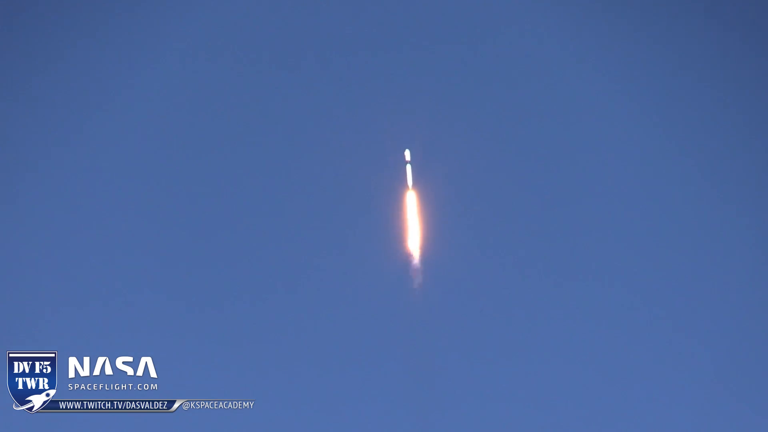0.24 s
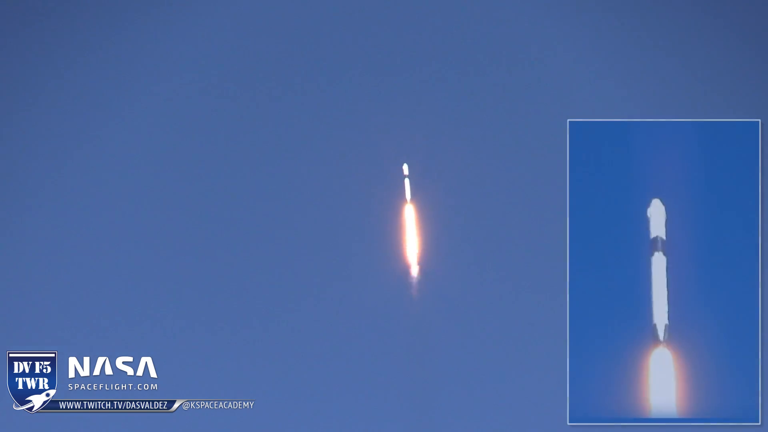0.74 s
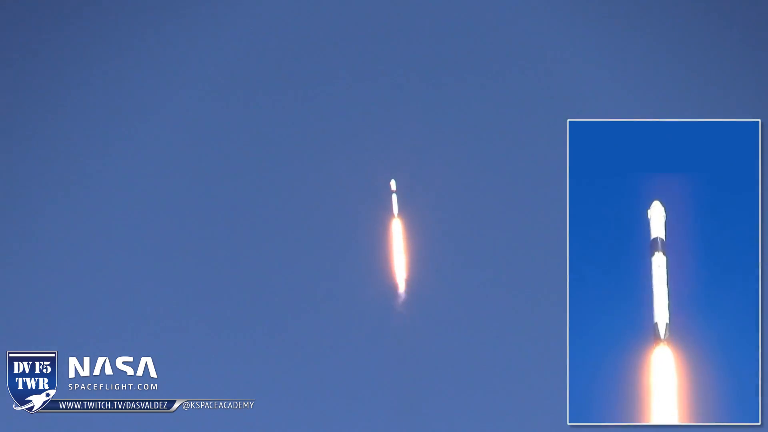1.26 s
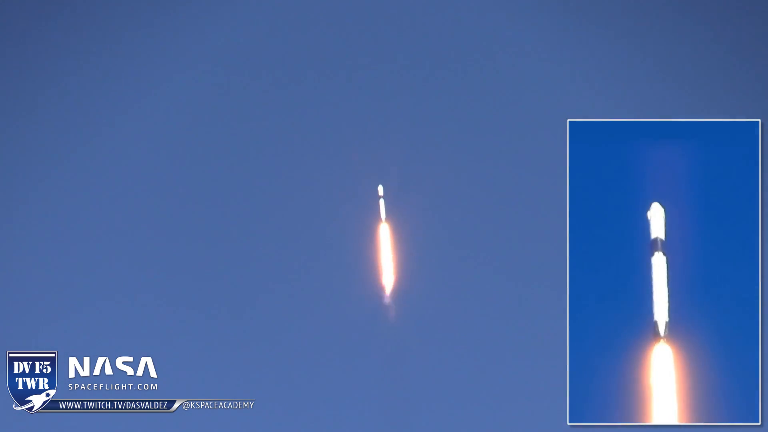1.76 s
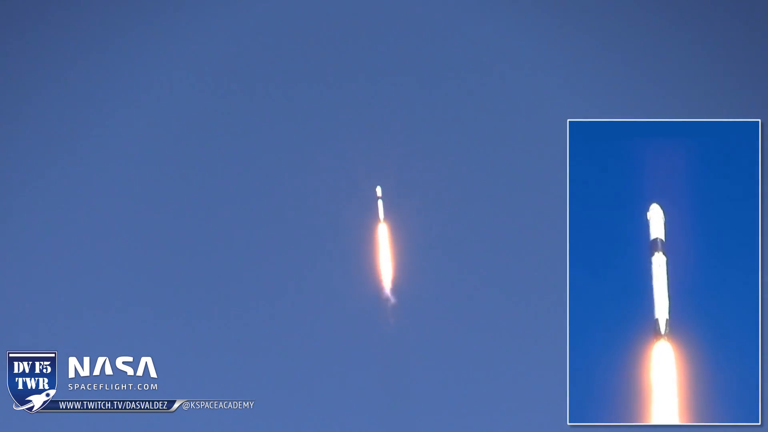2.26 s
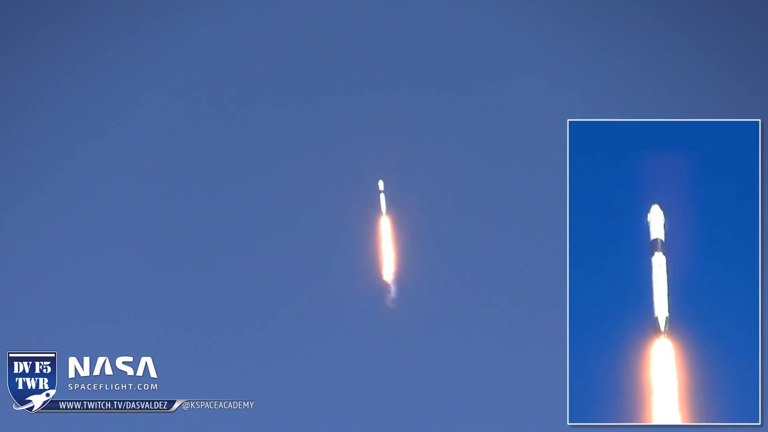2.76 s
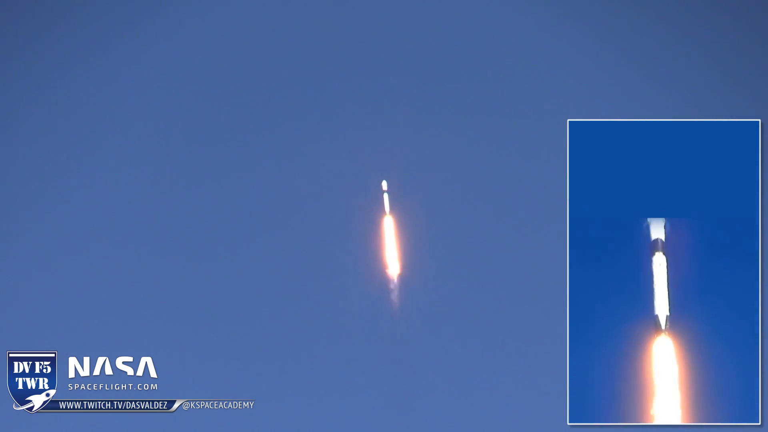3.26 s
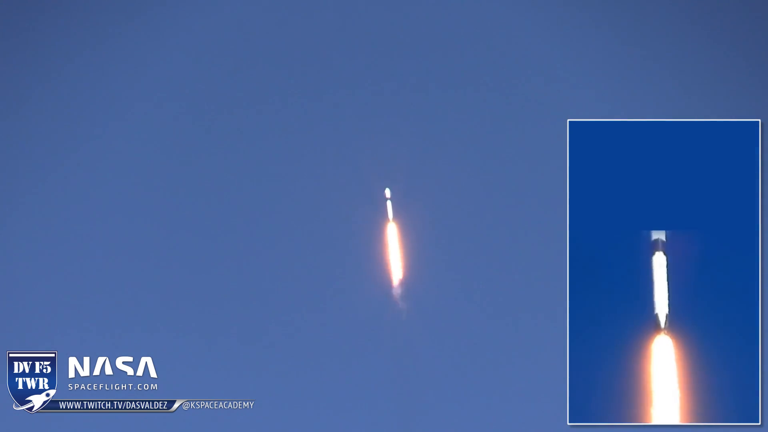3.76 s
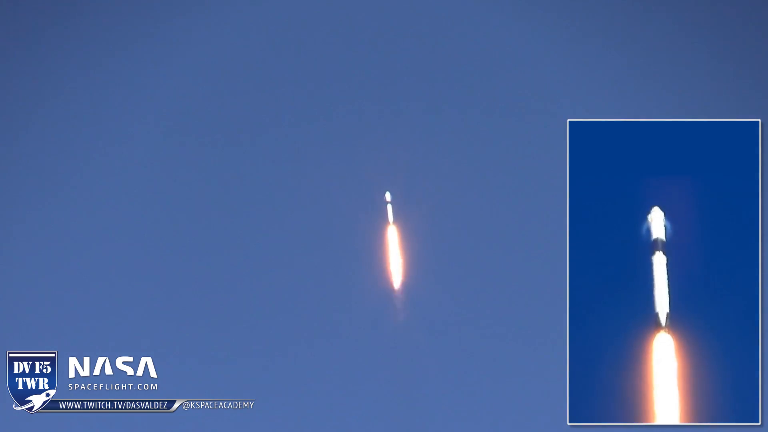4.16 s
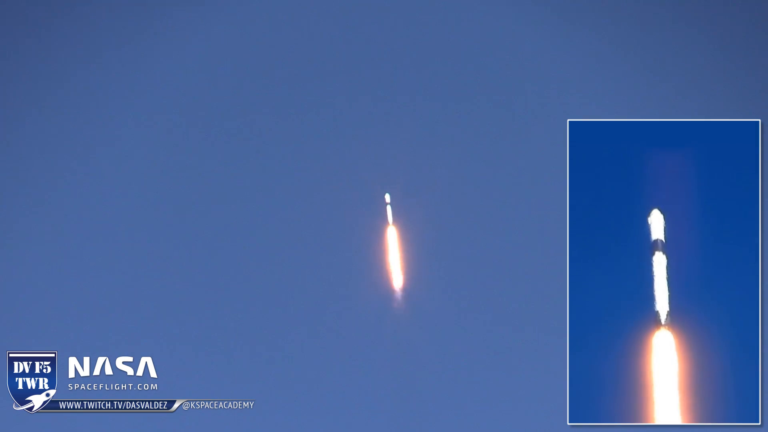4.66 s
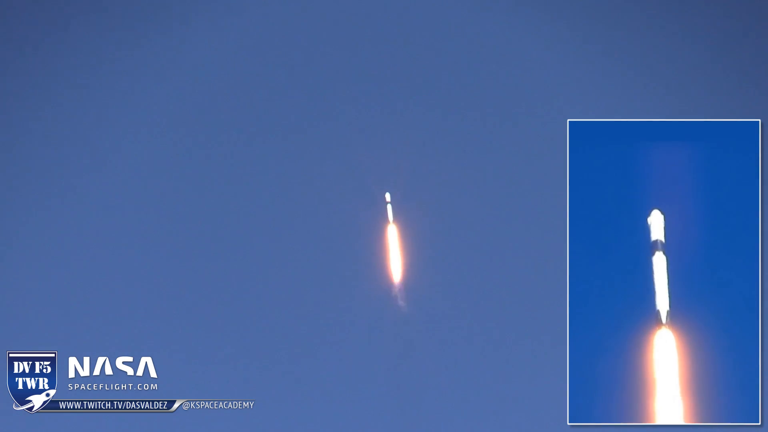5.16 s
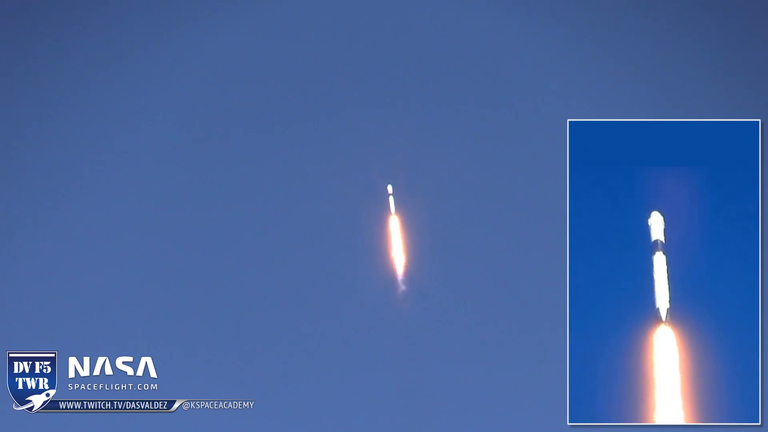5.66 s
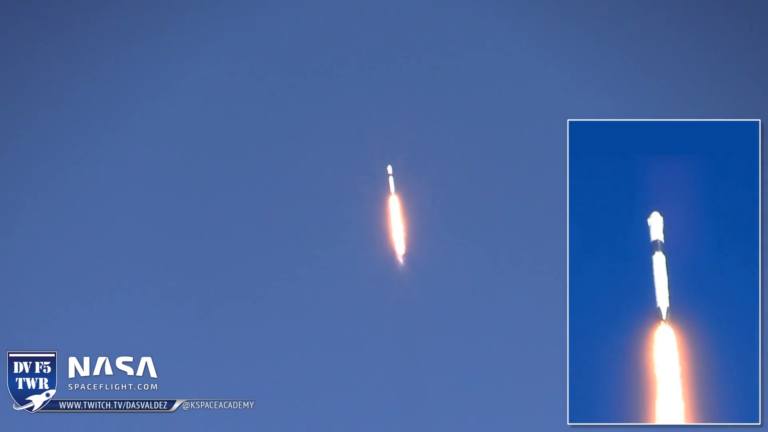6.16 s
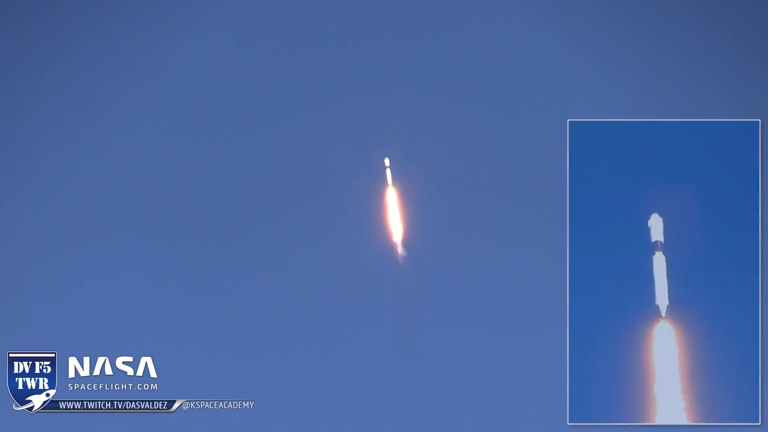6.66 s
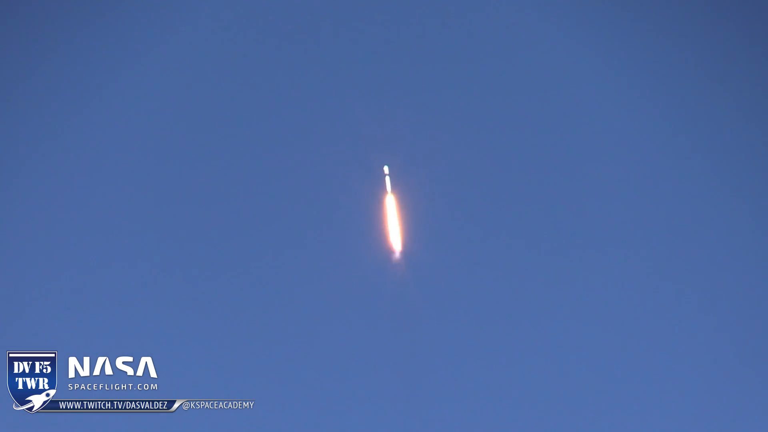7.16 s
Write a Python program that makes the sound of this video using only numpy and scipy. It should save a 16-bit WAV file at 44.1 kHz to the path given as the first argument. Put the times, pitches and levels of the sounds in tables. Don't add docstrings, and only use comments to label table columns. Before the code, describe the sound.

Loud, close-packed crackling from rocket exhaust, recorded outdoors from the ground at long distance. Low thumps of varying strength tumble over one another without rhythm, and harder cracks burst out with ragged edges and brief overload clicks. The rumbling roar underneath sinks in the middle and swells at the end. Short scattered reflections come from ground and trees; the image is almost centred, with very faint wind hiss.

```python
import sys
import numpy as np
from scipy import signal
from scipy.fft import rfft, irfft, next_fast_len
from scipy.io import wavfile
from scipy.ndimage import uniform_filter1d, map_coordinates

SR = 44100
rng = np.random.default_rng(int(sys.argv[2]) if len(sys.argv) > 2 else 0)


def store_pcm(level_fs):
    pcm = np.round(np.clip(level_fs, -1, 1) * 32767).astype(np.int16)
    wavfile.write(sys.argv[1], SR, np.atleast_2d(pcm).T)


def field_ratio(decibels):
    return 10 ** (np.asarray(decibels, dtype=float) / 20)


N = 327222

# start_s [s], level_db [dB]
ROAR_LEVEL = [(0, -19.5), (0.54, -21), (0.93, -21), (1.34, -28), (1.84, -24.5), (2.07, -28), (2.55, -20.5),
              (2.93, -29), (3.3, -26.5), (3.75, -24.5), (4.19, -23.5), (4.63, -25.5), (5.5, -23.5),
              (6.08, -25.5), (6.88, -21), (7.42, -18)]
# start_s [s], level_db [dB]
RUMBLE_LEVEL = [(0, -22.5), (0.55, -18), (1.0, -19), (1.6, -30.5), (2.1, -25.5), (2.7, -21), (3.2, -26),
                (4.2, -30.5), (4.7, -37.5), (6.0, -37), (7.42, -26.5)]
# pitch_hz [Hz], level_db [dB per Hz]
RUMBLE_TONE = [(13, -32.5), (22, -12.5), (70, 5.5), (95, 3.5), (130, -9.5), (170, -32.5), (290, -120)]
# pitch_hz [Hz], level_db [dB per Hz]
ROAR_TONE = [(35, -44), (60, 5), (133, 0.5), (256, -3.5), (350, -3.5), (442, -13), (533, -9.5),
             (1220, -36.5), (2500, -61.5), (3250, -85.5), (5500, -120)]
# pitch_hz [Hz], level_db [dB]
HAZY_ROAR_TONE = [(80, -5), (130, 3), (180, 6), (270, 0), (500, -5), (1500, -3.5)]
# start_s [s], haze [0-1]
HAZE_AMOUNT = [
    (0, .05),
    (2.0, 0.3),
    (3.0, 0.5),
    (3.9, 0.8),
    (4.3, 1),
    (5.5, 0.9),
    (6.3, 0.98),
    (6.9, .35),
    (7.42, .5),
]

# start_s [s], hiss_db [dB]
WIND_LEVEL = [(0, -73.5), (1.03, -78), (1.42, -83.5), (2.04, -82), (2.6, -80.5), (3.1, -88), (3.62, -80),
              (3.97, -78.5), (4.5, -79.5), (4.86, -83.5), (5.3, -75.5), (5.8, -80), (6.5, -75), (7.42, -74)]
# pitch_hz [Hz], level_db [dB per Hz]
WIND_TONE = [(1060, -25.5), (1800, 0.5), (2310, -4.5), (3110, -7), (5580, -14), (13600, -15.5),
             (15400, -31)]
# pitch_hz [Hz], level_db [dB]
PORT_TONE = [(2500, -29.5), (3800, -2), (6800, 0), (8500, -9), (13000, -9.5), (14500, -60)]
# pitch_hz [Hz], level_db [dB]
STEADY_HISS = [(11900, 1.0), (12300, -44.5)]
PUFF_HISS = [(4800, -4), (5400, -40)]
TOP_HISS = [(14300, 0.5), (14700, -50.5)]

# start_s [s], step_db [dB], front_ms [ms]
ROUNDED_THUDS = [(0.003, -1.5, 0.77), (0.0091, -2.5, 0.99), (0.0525, -5, 0.89), (0.1106, -8.5, 1.2),
                 (0.137, -4, 0.83), (0.1417, -4, 1.3), (0.1809, -10, 0.74), (0.2273, -6, 1.1),
                 (0.231, 0.6, 0.64), (0.2431, -5.5, 1.1), (0.2738, -5, 3.1), (0.3302, -7, 0.43),
                 (0.3369, -5, 2.3), (0.3414, -3, 0.74), (0.3447, -8.5, 0.9), (0.3968, -7.5, 0.76),
                 (0.4332, -5.5, 0.87), (0.466, -10, 0.68), (0.565, -8, 0.42), (0.57, -5, 2.3),
                 (0.6593, -7.5, 0.82), (0.6809, -4, 0.67), (0.7135, -7, 2.8), (0.719, -3.5, 1.2),
                 (0.7755, -10, 1.4), (0.8004, -6, 2.2), (0.8227, -4.5, 0.89), (0.8467, -8, 2.3),
                 (0.887, -9, 2.1), (0.913, -6.5, 1.35), (0.9219, -9.5, 0.9), (0.9276, -5.5, 2.5),
                 (0.9399, -6.5, 0.95), (0.9704, -7.5, 1.6), (0.998, -5.5, 0.98), (1.0197, -7.5, 1),
                 (1.043, -3.5, 1), (1.0609, -10, 1.1), (1.0681, -8, 1.7), (1.0892, -4.5, 1.6),
                 (1.2085, -2, 1.2), (1.2781, -3, 1.1), (1.3151, -4, 1.1), (1.337, -9.5, 1.6), (1.37, -8, 1.8),
                 (1.5088, -2.5, 1.7), (1.6219, -12.5, 1.2), (1.664, -5.5, 0.83), (1.672, -11, 0.82),
                 (1.6923, -4, 1.3), (1.7518, 0.5, 0.77), (1.8352, -4.5, 0.64), (1.8497, -6.5, 1.1),
                 (1.9056, -10.5, 0.58), (1.965, -9, 1.4),
                 (1.983, -5.5, 1.1), (2.053, -3, 1.35), (2.064, -1, 1), (2.1981, -1, 1.2),
              (2.2542, -10.5, 1.2), (2.27, -8, 1.6), (2.2737, -5, 1.2), (2.287, -9.5, 0.91),
              (2.3001, -11, 1.6), (2.3585, -10.5, 1.1), (2.3912, -7, 1.8), (2.4515, 0, 1.35),
              (2.5284, -5, 2.1), (2.5591, -9.5, 0.7), (2.5937, -12.5, 0.79), (2.6324, -4.5, 0.87),
              (2.6377, -3.5, 0.9), (2.6499, -6, 1.9), (2.7073, 0, 0.7), (2.7206, -7.5, 0.9),
              (2.7449, -5, 0.71), (2.7479, -6, 1.3), (2.8511, -4, 0.74), (2.8565, -5, 1.2),
              (3.0209, -8.5, 1.3), (3.0274, -8.5, 0.9), (3.052, -3, 0.64), (3.066, -5, 0.59),
              (3.169, -5.5, 0.83), (3.2962, -8, 0.52), (3.338, -8, 0.76), (3.366, 0, 0.65),
              (3.4532, -6, 1.1), (3.4962, -5, 1.6), (3.5048, -0.5, 0.56), (3.5288, 0.5, 0.52),
              (3.589, -6, 2.3), (3.68, -7.5, 0.9), (3.7079, -5.5, 1.6), (3.7125, -2, 0.77),
              (3.7483, -6, 1.2), (3.772, -6.5, 2.1), (3.7762, -2, 0.59), (3.797, -9.5, 0.99),
              (3.801, -4, 0.52), (3.8277, -6.5, 1), (3.877, -7.5, 1.9), (3.881, -0.5, 0.55),
              (3.8939, -9, 2.3), (3.8984, -3.5, 0.69), (3.914, -6, 0.91), (3.9491, -7.5, 1.5),
              (3.975, -14.5, 0.85), (3.9954, -11, 0.8), (4.0084, -7.5, 0.74),
                 (4.0325, -3, 1.5), (4.0382, -4.5, 0.93), (4.0946, 0.8, 1.6), (4.1175, -2, 0.9),
                 (4.1306, -12, 1.35), (4.135, -3.5, 0.7), (4.1543, -6, 1.5), (4.1591, -9.5, 1.2),
                 (4.1859, -1.6, 1.3), (4.216, -2.5, 1.35), (4.223, -8.5, 1.1), (4.2565, -1, 1.6),
                 (4.2715, -12, 0.95), (4.2784, -4, 1.5), (4.284, -9, 1.6), (4.2877, -2, 1.35),
                 (4.2929, -6.5, 1), (4.313, -7.5, 0.83), (4.3233, -6.5, 1.6), (4.3396, -10, 1.7),
                 (4.346, -11, 1.6), (4.3654, -7, 1.1), (4.4119, -11, 1.5), (4.4135, 1.5, 0.64),
                 (4.5, -10, 1.35), (4.5582, -6.5, 1.6), (4.6109, -9, 1.33), (4.672, -4, 1.6),
                 (4.8694, -11, 1.5), (4.8891, -9, 1.9), (4.9134, -10.5, 2.1), (4.9214, -7, 1.6),
                 (4.9708, -3, 0.9), (5.0505, 4, 0.56), (5.082, -4.5, 1.7), (5.119, -8.5, 1.5),
                 (5.1399, -3.5, 1.7), (5.1655, -10, 1.35), (5.2294, -5.5, 1.8), (5.2456, -6, 1.35),
                 (5.2675, -9, 1.8), (5.302, -4.5, 1.6), (5.3216, -1.5, 1.5), (5.3464, -7.5, 1.35),
                 (5.3541, -3.5, 1.6), (5.3755, -1.5, 2.1), (5.4517, 4, 1.2), (5.4884, -8, 2.3),
                 (5.4975, -9.5, 1.7), (5.5273, -4, 1.8), (5.5437, -9, 1.7), (5.5677, -10, 1.7),
                 (5.5932, -3.5, 1.8), (5.6607, -7, 1.6), (5.69, -4.5, 1.6), (5.7081, -5.5, 1.9),
                 (5.742, -5, 1.8), (5.7984, -4.5, 1.7), (5.854, -7.5, 1.7), (5.8884, -2.5, 1.4),
                 (5.9584, -3.5, 1.1), (5.9849, -9, 1.9), (6.0334, -6.5, 1.6), (6.061, -5, 1.7),
                 (6.09, -9, 1.3), (6.1155, -7.5, 2.1), (6.129, -6.5, 1.9), (6.153, -3, 1.3),
                 (6.213, -5.5, 1.35), (6.2662, -4.5, 1.3), (6.3169, -8.5, 2.7), (6.3226, -3.5, 1.4),
                 (6.3366, -6.5, 2.1), (6.376, -8.5, 1.3), (6.4216, -4, 1.35), (6.4416, -4, 1.9),
                 (6.5182, -5.5, 1.3), (6.5565, -2.5, 1.8), (6.5764, -5, 1.1), (6.6055, -10.5, 1.35),
                 (6.617, -9.5, 1.5), (6.713, -10.5, 1.35), (6.7352, -9.5, 1.8), (6.7675, -5, 1.1),
                 (6.814, -5.5, 1.2), (6.839, -1, 1.6), (6.861, -6.5, 0.96), (6.945, -9, 1.5),
                 (7.0076, -2, 1.1), (7.0192, -8.5, 2.1), (7.0242, -10.5, 1.6), (7.0673, -1.1, 1.3),
                 (7.074, -11, 1.2), (7.0795, -5, 2.1), (7.0852, -6, 1.6), (7.0921, -8.5, 1.7),
                 (7.1115, -0.9, 1.1), (7.1482, -8, 0.5), (7.1725, -5.5, 1.5), (7.1944, -11, 1.4),
                 (7.2415, -2.5, 1.2), (7.2577, -10, 2.1), (7.267, -4, 1.2), (7.2716, -12, 1.2),
                 (7.283, -11.5, 2.8), (7.29, -1, 1.4), (7.296, -10.5, 1.5), (7.3119, -14.5, 1.1),
                 (7.3513, -7, 1.35), (7.3645, -9.5, 2.3), (7.3762, -4.5, 1.2), (7.384, -6.5, 1.9)]
# start_s [s], trough_db [dB]
STRAY_THUDS = [(0.066, -8), (0.263, -12), (0.4831, 1), (0.5528, -15.5), (0.717, 3), (0.9302, -2),
               (1.024, -11.5), (1.2264, -9), (1.4716, -9.5), (1.613, -8), (1.8013, -7), (1.9002, -11.5),
               (2.0278, -13), (2.3235, -9), (2.9852, -7), (3.1066, -9), (3.187, -9), (3.571, -4.5),
               (3.7386, -9), (3.9244, -11.5), (3.9952, -7.5), (4.0284, -11.5), (4.0666, -0.5),
               (4.1485, -10.5), (4.262, -7.5), (4.3283, -10), (4.3853, 2.8), (4.4142, -4.5), (4.4758, -1.8),
               (4.5645, -7), (4.726, 3.1), (4.7699, -13.5), (4.8592, -9.5), (4.8962, -12), (5.3964, -13),
               (5.429, -9.5), (5.5551, -17), (5.7276, -12), (6.3038, -10.5), (7.0139, -5), (7.163, -8.5),
               (7.346, -0.8)]
# start_s [s], least_ms [ms]
LEAST_FRONT = [
    (0, 0.36),
    (1.3, 0.55),
    (2.2, 1),
    (3.1, 1.12),
    (3.9, 1.23),
    (4.4, 1.39),
    (5.2, 1.68),
    (5.7, 1.3),
    (7.42, 0.59),
]
# start_s [s], step_db [dB], front_ms [ms], edge_db [dB]
SOFT_SHOCKS = [(0.1256, -0.5, 0.91, -35), (0.145, -3, 1.1, -30.5), (0.2026, -4.5, 1, -39.5),
               (0.2349, 1, 0.82, -23.5), (0.278, -2.5, 1, -40), (0.521, -2, .98, -25),
               (0.723, -1, 0.85, -20.5), (0.7884, -3.5, 0.79, -37), (0.856, -1, 0.98, -21.5),
               (1.0748, 0.3, 1.4, -38.5), (1.3441, -2.5, 1.6, -36.5), (1.63, -4, 0.96, -13.5),
               (2.0977, -2.5, 1.1, -30), (2.1427, 0, 1, -23), (2.369, 2, 1, -37.5), (2.4, 1.5, 1.1, -22.5),
               (2.4433, -2, 1.4, -33.5), (2.481, -1, 1.1, -32.5), (2.565, 0, 1.4, -33),
               (2.8108, -14.5, 0.28, -31), (2.894, -2.5, 0.95, -30), (3.128, -9, 0.52, -18.5),
               (3.254, -2, 0.86, -33.5), (3.4609, -3, 0.91, -39.5), (3.7511, -2, 0.98, -33.5),
               (3.8309, -0.5, 1.1, -35), (4.5472, -2.5, 1.3, -39.5), (4.8088, -1.5, 1.3, -24.5),
               (4.8362, -1, 1.3, -20), (4.9943, -0.6, 1.3, -29.5), (5.9361, -3, 1.2, -33.5),
               (6.469, 0, 1.2, -26)]
# start_s [s], step_db [dB], front_ms [ms], edge_db [dB]
HARD_SHOCKS = [(0.324, 5.5, .85, -21), (0.4781, -0.5, 0.94, -8.5), (0.5572, 4.5, 0.82, -8),
               (0.9055, -0.5, 0.83, -10), (1.0355, 2, 1.2, -15.5), (1.1192, 4, 1.1, -13.5),
               (1.259, 2.5, 1.4, -13.5), (1.396, 2.5, 0.62, -28.5), (1.4526, 1.3, 1.6, -6.5),
               (1.6045, -3.5, .7, -14.5), (1.742, -0.5, 1.4, -9.5), (1.7872, 1.5, 1.2, -16),
               (1.824, 4, 1.2, -17.5), (1.895, 5, 1.1, -7), (2.3319, 5, 0.8, -14), (2.5993, 2, 1.2, -12.5),
               (2.695, 2.5, 1.1, -19), (2.8131, 2.5, 0.47, -27.5), (2.9447, 1, 1.1, -18.5),
               (3.1308, 0.5, 0.75, -22.5), (4.0617, 1, 1.1, -22), (4.0977, 3, 1, -16.5), (4.3798, 5, 1, -3),
               (4.47, 1.5, 1.1, -14), (4.7194, 3.5, 1.1, -7.5), (5.605, 5, 1.3, -18.5),
               (6.6576, 4, 1.1, -17), (6.8932, 2, 1, -15), (7.138, 2, 0.73, -17), (7.3405, 2.5, 1.2, -20)]
# start_s [s], extra_db [dB]
EDGE_BRIGHTNESS = [(0.3237, 10), (0.5566, 5), (1.1203, 5.5), (1.259, -2.5), (1.4518, 9.5), (1.6045, 12),
                   (1.742, 5.5), (1.895, 11), (2.1414, 8), (2.8135, -14), (3.1328, 19), (3.7521, 11),
                   (4.7195, 6.5), (6.6576, 3), (6.8934, -12), (7.3404, -22)]
# pitch_hz [Hz], level_db [dB]
DULL_EDGE = [(250, -25.5), (500, 2.5), (900, 4.5), (1500, -10.0), (2200, -38.5), (3500, -57.5), (9000, -110)]
BRIGHT_EDGE = [(900, -29.0), (1600, 1.5), (2200, -6.0), (3200, -23.0), (5000, -36.5), (8000, -69.0), (13000, -110)]

# pitch_hz [Hz], t60_s [s]
ECHO_LENGTH = [(100, 0.69), (500, 0.41), (1500, 0.25), (4000, 0.029)]
# pitch_hz [Hz], level_db [dB]
ECHO_TONE = [(60, -19), (200, -18.5), (700, -3.5), (1800, -10), (5000, -15.5)]
# pitch_hz [Hz], level_db [dB]
SIDE_TONE = [(60, -40), (250, -44), (700, -32), (1500, -27.5), (4000, -12)]

# start_s [s], peak_db [dB]
OVERLOADS = [(0.3239, -20), (0.559, -21), (1.1182, -22), (1.245, -49.5), (1.3959, -20), (1.438, -44),
             (1.745, -46), (1.8956, -19.5), (2.0664, -37), (2.3207, -40.5), (2.4512, -34.5),
             (2.8118, -19.5), (2.9396, -44), (3.1295, -19.5), (3.251, -46.5), (3.3823, -52), (3.772, -45.5),
             (4.325, -42), (4.3781, -25.5), (4.55, -47), (4.718, -30.5), (4.9745, -49.5), (5.529, -41),
             (5.6031, -20), (5.9286, -48), (6.6586, -24.5)]
# start_s [s], left_over_right_db [dB]
OVERLOAD_LEAN = [
    (0.3238, 2),
    (0.559, -0.5),
    (1.3959, 1),
    (4.3784, -6),
    (4.7173, -6),
]
# pitch_hz [Hz], level_db [dB]
TICK_TONE = [(500, -10.5), (1500, 14.5), (3000, 3.5), (4300, 0.5), (6000, -4.0), (9000, -5.5),
             (14300, -8.5), (15000, -36.5), (16000, -88.5)]
# start_s [s], peak_db [dB], width_ms [ms]
PRESSURE_SPIKES = [
    (2.8106, -4, .19),
    (2.8136, -8.5, .1),
    (3.1268, -11, 0.41),
    (3.1295, -12, 0.097),
]
# pitch_hz [Hz], level_db [dB]
MICROPHONE_TONE = [(8, -59.5), (25, -16), (40, -5.5), (100, 2.0)]


def unit(x):
    return x / np.sqrt(np.mean(x ** 2) + 1e-20)


def along(points, pitch_hz):
    hz, value = np.transpose(points)
    return np.interp(np.log(pitch_hz + 1), np.log(hz + 1), value)


def curve(rows):
    return np.interp(np.arange(N) / SR, *np.transpose(rows))


def wobble(rate_hz):
    knots = rng.standard_normal(int(N * rate_hz / SR) + 4)
    return map_coordinates(knots, [np.arange(N) * rate_hz / SR])


def noise():
    return rng.standard_normal(N)


def coloured(x, tone):
    size = next_fast_len(N + 8192)
    gain = field_ratio(along(tone, np.fft.rfftfreq(size, 1 / SR)))
    return irfft(rfft(x, size) * gain, size)[..., :N]


def placed(waves, start_s, lead):
    at = np.round(start_s * SR).astype(int)[:, None] + np.arange(waves.shape[1])
    total = np.bincount(at.ravel(), waves.ravel(), N + 2 * waves.shape[1])
    return total[lead:][:N]


def haze(start_s):
    return np.clip(np.interp(start_s, *np.transpose(HAZE_AMOUNT)), 0, 1)


def fronts(start_s, step_db, front_ms, least_ms=0):
    size, lead = 2048, 512
    t_ms = (np.arange(size) - lead) / SR * 1000
    after_ms = np.maximum(t_ms, 0)
    front = np.clip(front_ms, .3, 4)[:, None]
    swing_ms = 1.894 + 3.53 * front
    build = 0.53 * np.exp(np.minimum(t_ms, 0) / (0.14 * swing_ms))
    recover = -np.exp(-after_ms / (0.4 * swing_ms)) * np.cos(2 * np.pi * t_ms / swing_ms)
    heave = 0.089 * np.exp(-after_ms / 15.0) * np.sin(2 * np.pi * after_ms / 18.0)
    pressure = np.where(t_ms < 0, build, recover + heave)

    pitch_khz = np.fft.rfftfreq(size, 1000 / SR)
    rounded_ms = np.maximum(front, np.reshape(least_ms, (-1, 1)))
    air = np.exp(-(0.26 * 2 * np.pi * pitch_khz * rounded_ms) ** 2)

    lag_ms = np.arange(size) / SR * 1000
    paths = rng.standard_normal((len(start_s), size)) * np.exp(-lag_ms / 6.2) * (lag_ms < 30)
    paths = rfft(paths / np.linalg.norm(paths, axis=1, keepdims=True))
    high_part = 1 / (1 + (450 / (np.fft.rfftfreq(size, 1 / SR) + 1)) ** 4)
    ragged = np.clip(1.6 * front - .3, .2, 1) * high_part
    air = air * (1 - 0.7 * ragged + 1.13 * ragged * paths)

    wave = field_ratio(step_db)[:, None] * irfft(rfft(pressure) * air, size)
    return placed(wave * signal.windows.tukey(size, .3), start_s, lead)


def roar():
    rumble = unit(coloured(noise(), RUMBLE_TONE))
    draw = rng.random((450, 3))
    small = fronts(draw[:, 0] * N / SR, -12 * draw[:, 1], 1.3 + 1.2 * draw[:, 2])
    blur = field_ratio(2.2 * np.tanh(wobble(25))) * coloured(noise(), ROAR_TONE)
    far = haze(np.arange(N) / SR)
    blur = (1 - far) * blur + far * coloured(blur, HAZY_ROAR_TONE)
    merged = field_ratio(-14.0) * unit(small) + field_ratio(-6.0) * unit(blur)
    return field_ratio(curve(RUMBLE_LEVEL) - 1.5) * rumble + field_ratio(curve(ROAR_LEVEL)) * merged


def wind():
    hiss = unit(coloured(noise(), WIND_TONE + [(16000, -120)]))
    low = coloured(hiss, STEADY_HISS)
    gust_db = curve(WIND_LEVEL) + 3.8 + 1.3 * wobble(13)
    puffs = 1. * (gust_db + 2 * wobble(16) > -77)
    flutter = uniform_filter1d(puffs, size=600)
    gust = field_ratio(gust_db + 2.0 * np.maximum(wobble(45) - 1, 0))
    ports = unit(coloured(noise(), [(1500, -78.5)] + PORT_TONE))
    ports = field_ratio(-87 + 3.0 * wobble(20)) * ports
    low = low + field_ratio(1.2 * (gust_db + 72.5) + 2.5 * wobble(7.8)) * coloured(hiss, PUFF_HISS)
    top = flutter * coloured(hiss - low, TOP_HISS)
    return gust * (low + top) + np.array([ports, -ports])


def thuds():
    late = [(start_s, trough_db - 2.5, .9) for start_s, trough_db in STRAY_THUDS]  # step_db, front_ms
    rows = ROUNDED_THUDS + late
    start_s, step_db, front_ms = np.transpose(rows)
    edge_db = step_db - 35 - 14.5 * haze(start_s)
    return np.transpose([start_s, step_db, front_ms, edge_db])


def all_shocks():
    return np.vstack([HARD_SHOCKS, SOFT_SHOCKS, thuds()]).T


def crackle():
    start_s, step_db, front_ms, _ = all_shocks()
    row = np.arange(len(start_s))
    hard = row < len(HARD_SHOCKS)
    is_thud = row >= len(HARD_SHOCKS + SOFT_SHOCKS)
    least_ms = np.where(is_thud, np.interp(start_s, *np.transpose(LEAST_FRONT)), 0)
    direct = fronts(start_s, step_db, front_ms, least_ms)
    bounce_s = np.where(hard, 0.0068, 0.0054) + 0.00068 * rng.standard_normal(len(start_s))
    bounce_db = -16
    bounce = fronts(start_s + bounce_s, step_db + bounce_db, 1.1 * front_ms, least_ms)
    return direct + bounce


def splinters():
    start_s, step_db, _, edge_db = all_shocks()
    sharp_s, sharp_db = np.transpose(EDGE_BRIGHTNESS)
    same_shock = np.abs(start_s[:, None] - sharp_s) < .006
    bright_db = -27 + step_db + same_shock @ sharp_db
    start_s = start_s - 0.0015
    t = np.arange(2048) / SR
    fading = field_ratio(-60 * t / 0.031) + field_ratio(-9.0 - 60 * t / 0.26)
    spray = rng.standard_normal((len(start_s), len(t))) * fading
    spray *= field_ratio(-.4 * (edge_db + 28.0))[:, None]
    spray *= np.cos(np.pi / 2 * t / t[-1])
    spray[:, 0] += 5.5
    dull = placed(field_ratio(edge_db)[:, None] * spray, start_s + .001, lead=0)
    bright = placed(field_ratio(edge_db + bright_db)[:, None] * spray, start_s + 0.00091, lead=0)
    return field_ratio(1.5) * coloured(dull, DULL_EDGE) + field_ratio(6.0) * coloured(bright, BRIGHT_EDGE)


def field(x):
    step = SR // 6
    out = np.zeros(N + 2 * SR)
    fade = np.hanning(2 * step)
    padded = np.pad(x, (step, 2 * step))
    for start in range(0, N + step, step):
        hz, t, grains = signal.stft(rng.standard_normal(SR // 3), SR, nperseg=256)
        fading = field_ratio(-60 * t / along(ECHO_LENGTH, hz)[:, None])
        tail = signal.istft(grains * fading, SR, nperseg=256)[1]
        piece = fade * padded[start:start + 2 * step]
        answer = signal.fftconvolve(piece, tail / np.linalg.norm(tail))
        out[start + 90:][:len(answer)] += answer
    return coloured(out[step:][:N], ECHO_TONE)


def overload():
    ticks = np.zeros((2, N))
    lean_s, lean_db = np.transpose(OVERLOAD_LEAN)
    for k, (start_s, peak_db) in enumerate(OVERLOADS):
        lean = (np.abs(lean_s - start_s) < .005) @ lean_db / 2
        lag = np.array([0, k % 2])
        at = round((start_s + .0011) * SR) + lag
        ticks[[0, 1], at] = field_ratio(peak_db + 5.5 + np.array([lean, -lean]))
    return coloured(ticks, TICK_TONE)


def spikes():
    start_s, peak_db, width_ms = np.transpose(PRESSURE_SPIKES)[..., None]
    away_ms = (np.arange(N) / SR - start_s) * 1000
    return (field_ratio(peak_db) * np.exp(-(away_ms / width_ms) ** 2 / 2)).sum(0)


def ducked(x):
    trip_level, drop_db, release_s = 0.48, 2, 0.022
    excess = np.maximum(np.abs(x).max(0) - trip_level, 0) * 1000 / SR
    held = signal.lfilter([1], [1, -np.exp(-1 / (release_s * SR))], excess)
    return x * field_ratio(-drop_db * held)


def scene():
    shocks = crackle() + splinters() + spikes()
    mid = shocks + roar() + field_ratio(-16.5) * field(shocks)
    offset = np.roll(shocks, 40) - np.roll(shocks, -40)
    side = coloured(offset + field(mid), SIDE_TONE)
    return np.array([mid + side, mid - side]) + wind()


def low_pass(x):
    return signal.sosfilt(signal.butter(12, 15530, fs=SR, output="sos"), x)


def record(dry):
    heard = coloured(dry, MICROPHONE_TONE)
    heard = heard * np.minimum(np.arange(N) / (.003 * SR), 1)
    heard = ducked(heard)
    held = heard / (1 + np.abs(heard / .99) ** 14) ** (1 / 14)
    return low_pass(held + overload())


dry = scene()
out = record(dry)
store_pcm(out)
```